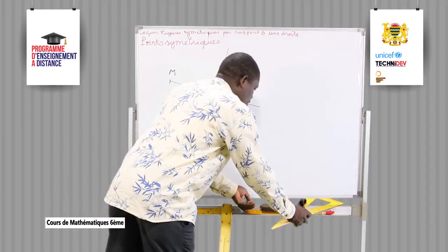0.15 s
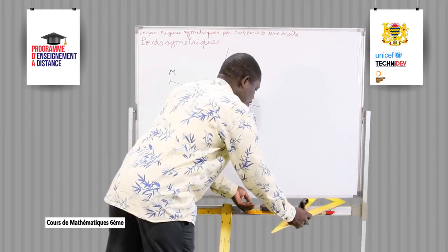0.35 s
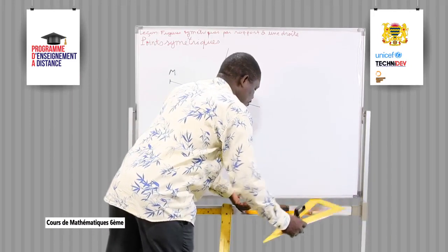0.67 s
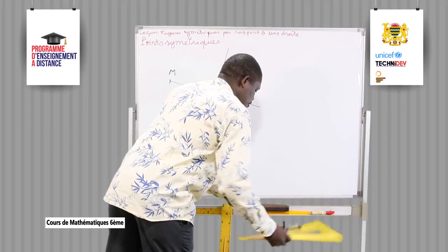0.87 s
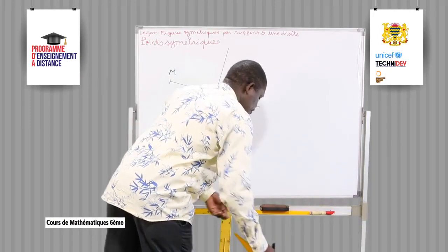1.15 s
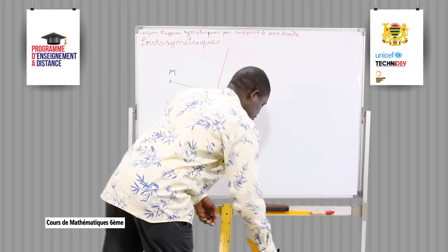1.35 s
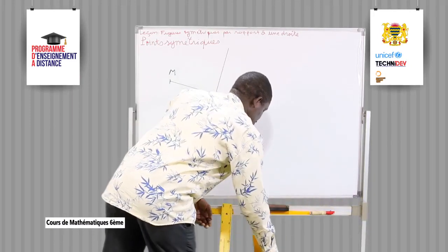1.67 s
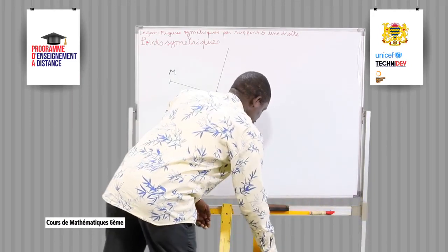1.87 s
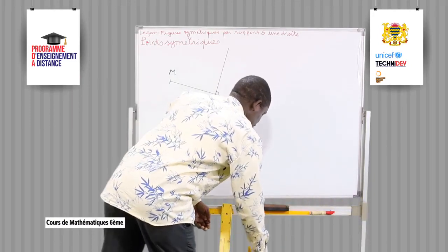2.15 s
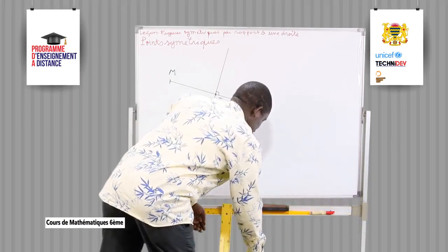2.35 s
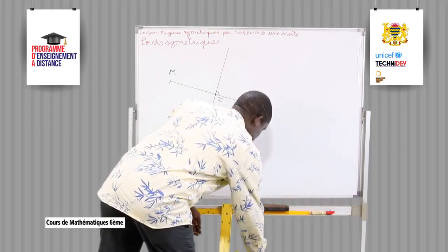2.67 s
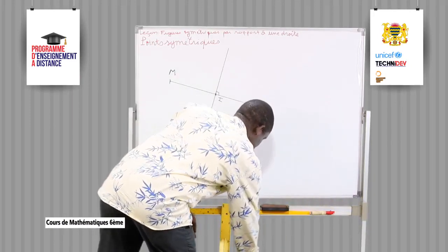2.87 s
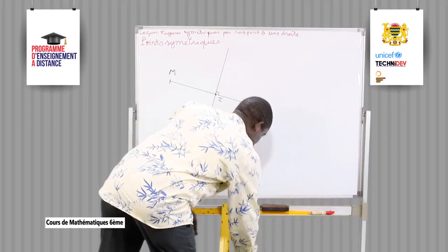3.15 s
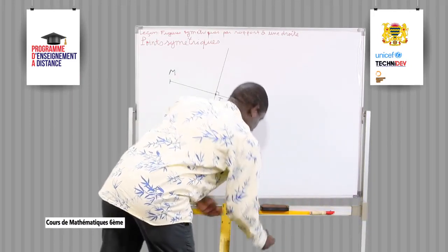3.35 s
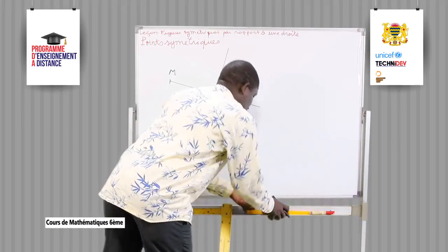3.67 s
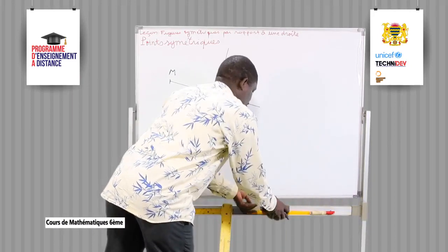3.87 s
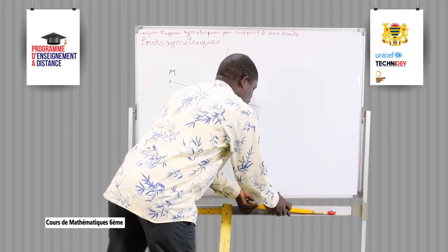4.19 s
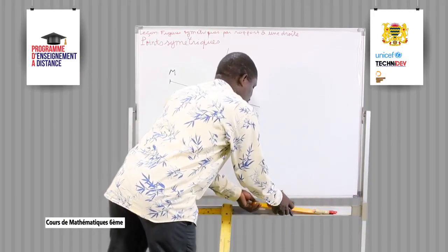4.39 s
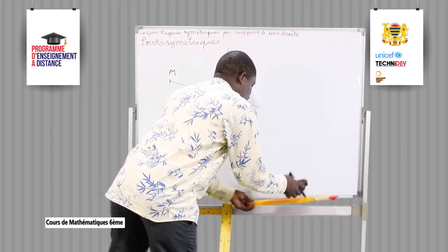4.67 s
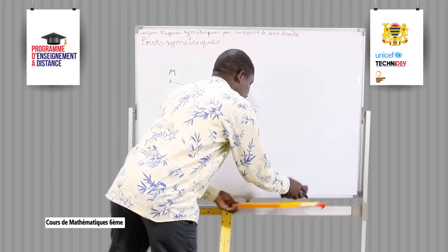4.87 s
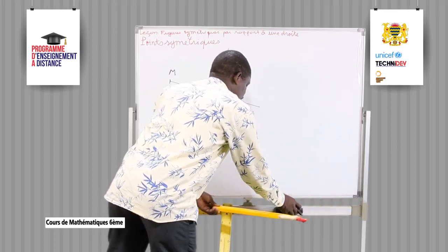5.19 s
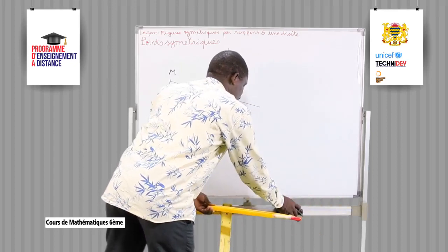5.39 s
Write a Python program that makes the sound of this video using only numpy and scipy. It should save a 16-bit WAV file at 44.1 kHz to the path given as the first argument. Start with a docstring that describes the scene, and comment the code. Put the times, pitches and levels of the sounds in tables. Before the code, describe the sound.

Light plastic taps and scrapes on a metal ledge, a sudden rattling drop, then a few hard knocks as tools are handled in a quiet room.

```python
"""A set square knocks and slides on a metal whiteboard tray and is let fall among other tools.
A large plastic compass is picked out and a marker laid down: cracks, fading modes, dense noise rings.
Slides are filtered streams of uneven slips; damped tones give lone thuds and ticks. The board and its
stand shudder in the bass, a shirt rustles as flickering noise near the one microphone, and a small
quiet room adds a short tail over the shaped-noise hiss of room and recorder."""
import sys
import numpy as np
from scipy import signal
from scipy.fft import rfft, irfft
from scipy.io import wavfile
from scipy.ndimage import uniform_filter1d

SR = 44100
rng = np.random.default_rng(int(sys.argv[2]) if len(sys.argv) > 2 else 0)


def store_wav(level_fs):
    """Save 16-bit WAV to argv[1]."""
    pcm = np.round(np.clip(np.atleast_2d(level_fs), -1, 1) * 32767)
    wavfile.write(sys.argv[1], SR, pcm.T.astype(np.int16))


N = 243873
T_S = np.arange(N) / SR

# Steady hiss. Each row: frequency in Hz, relative density in dB per Hz.
HISS_SHAPE = [(15, -36.5), (25, 14), (39, -18.5), (70, -6), (185, -12.5), (317, 0.5), (373, -3.5),
              (962, -14), (1040, -31), (1480, -28.5), (16000, -44)]
HISS_RMS_DB, CHANNEL_HISS_DB = -64.5, -79

# Pushes that rock the stand. Each row: start in seconds, deep shudder in dB, panel hum in dB, t60 in seconds.
STAND_PUSHES = [(.1, -58, -64, 1.3), (.33, -65, -60, 0.68), (.45, -63, -80, 1.1), (.65, -51, -48.5, 0.51),
                (1.03, -48, -51, 1.36), (1.15, -60, -67, 1.5), (1.69, -65, -63, 0.44),
                (2.35, -67, -69, 0.83), (3.126, -24.5, -49, 0.55), (3.48, -30.5, -43.5, 0.9),
                (3.75, -49.5, -47.5, 0.99), (3.941, -41, -57.5, 0.96), (4.503, -41, -31.5, 0.57),
                (5.41, -56, -57, 1.1)]
SHUDDER_SWELL_S, HUM_SWELL_S = 0.092, 0.09  # t60 of the late onset
SHUDDER_REST_DB, HUM_REST_DB = -69.5, -65.5

# Shirt against the microphone. Each row: time in seconds, low rub in dB, high rub in dB.
SHIRT_RUBS = [(0.1, -67.5, -68), (0.28, -59, -65), (0.47, -69, -66.5), (0.83, -63, -64), (1.23, -57, -64),
              (1.39, -63, -63.5), (1.95, -69.5, -68.5), (2.72, -65.5, -63.5), (2.8, -58.5, -58.5),
              (2.9, -63.5, -64), (3.1, -67, -67), (3.799, -52, -60), (4.119, -60.5, -64.5), (4.3, -73, -68),
              (4.55, -54, -60.5), (4.859, -56.5, -57), (5.151, -57.5, -61.5), (5.53, -70.5, -67)]

# Lone soft thuds and ticks. Each row: start in seconds, approximate peak in dB, frequency in Hz, t60 in seconds.
LONE_SOUNDS = [(.075, -45, 1930, 0.0025), (1.704, -38, 135, 0.035), (1.849, -46, 1130, 0.013)]

# Plastic dragged and rattled over metal. Each row: start in seconds, stop in seconds, level at start in dB,
# level at stop in dB, low resonance and edge resonance in dB against the middle.
PLASTIC_SLIDES = [(0.175, 0.23, -66, -62, 1.5, 0), (0.274, 0.365, -52, -57.5, -1.5, -5.5),
                  (0.646, 0.658, -49, -54, -2, -1.5), (0.676, 0.741, -48.5, -43, -0.5, 1.5),
                  (1.248, 1.244, -64, -51.5, 9, -17), (3.2, 3.43, -44, -34, 0.5, -12.5),
                  (3.43, 3.53, -29, -37, -7, -8.5), (3.534, 3.674, -27, -33.5, -5.5, -10.5),
                  (4.128, 4.155, -64, -39.5, 9.5, -5), (4.952, 4.946, -56, -58.5, 4, 18.5),
                  (5.385, 5.413, -54.5, -55, 0.2, -6)]
SLIDE_RISE_DB_PER_S, SLIDE_FALL_DB_PER_S = 1498.5, 598

# Blows of each tool. Each row: start in seconds, level in dB, thump in dB against it, hardness in dB per
# octave, pitch in Hz favoured by the spot struck, share of the base ring length.
SQUARE_BLOWS = [(0.185, -53.5, 10.5, -4, 900, 0.77), (0.239, -50, -15, -6, 1150, 0.59),
                (0.269, -35.5, -57, -4, 755, 0.55), (0.277, -41.5, 5.5, -2.8, 1630, 0.52),
                (0.292, -37, -29, -6.5, 1630, 0.46), (0.338, -52, 10, -1.7, 1660, 0.73),
                (0.356, -45.5, 12.5, -3.5, 2650, 0.6), (0.402, -52, 6, -2.5, 890, 0.36),
                (0.642, -39, 7, -3, 655, 0.74), (0.727, -38.5, -13, -1.5, 2780, 0.97),
                (0.76, -45.5, 2, -1, 2570, 0.33), (1.014, -31, -4, -1.3, 2270, 0.93),
                (1.255, -42.5, 1, -6, 880, 0.27), (1.309, -64.5, 0, 1, 592, 0.47),
                (1.437, -58.5, 21.5, 2.5, 540, 0.36)]
FALL_BLOWS = [(3.122, -15, -12, -0.95, 2200, 1.0), (3.138, -9, -15, 2.5, 810, 0.72),
              (3.161, -25.5, -30.5, 4.5, 2110, 0.87), (3.177, -22.5, -29.5, -6, 2160, 0.95),
              (3.194, -32, -30, .3, 636, 1), (3.227, -30.5, 1.5, -1, 860, 0.81),
              (3.268, -30, -12, 0.1, 836, 0.71), (3.314, -23, -10.5, -1.5, 2280, 0.76),
              (3.33, -20.5, -15, -3.5, 646, 0.35), (3.378, -32.5, -3, -4, 623, 0.96),
              (3.415, -30.5, -20, -6, 900, 1), (3.424, -22, -11.5, 2.5, 960, 0.8),
              (3.445, -22, -8.5, 0, 904, 0.47), (3.489, -21, -14, -3, 710, 0.6),
              (3.505, -26, -33, -2, 870, 0.81), (3.534, -21, -12, -3, 1890, 0.91),
              (3.563, -29.5, -34.5, -2, 895, 0.94), (3.589, -28.5, -9.5, -1.5, 730, 1),
              (3.616, -22.5, -27.5, -2.5, 1860, 1), (3.637, -30, -7, -1.5, 724, 1),
              (3.661, -36, -15, -2, 750, 1)]
COMPASS_BLOWS = [(3.977, -50.5, 6.5, -15, 958, 0.4), (3.993, -51.5, -8.5, -3.5, 710, 0.78),
                 (4.157, -28, -44, -5.5, 1030, 0.44), (4.168, -45, 5, -6, 860, 1.0),
                 (4.235, -46.5, -14, -0.5, 923, 0.45), (4.268, -40.5, -17, -10.5, 910, 0.47),
                 (4.462, -60, 16, -4, 620, 0.53), (4.47, -46, -7, -5, 1220, 1),
                 (4.507, -12.5, -24, -3.5, 774, 1.0), (4.598, -20.5, -20, -1, 1270, 0.29),
                 (4.616, -33.5, -1.5, -5, 857, 0.59), (4.643, -31, -12, -5, 650, 0.15),
                 (4.672, -34, -5.5, -2.4, 696, 0.28), (4.717, -38, -0.5, -4.5, 501, 0.22),
                 (4.751, -71.5, -1, 7, 810, 1.0), (5.415, -26, -5.5, -5, 724, 0.59),
                 (5.426, -20, -4, -4.5, 1503, 0.32)]
MARKER_BLOWS = [(4.937, -33, -4, -2.2, 2130, 0.47), (4.953, -26.5, -17, -2.5, 1960, 0.86),
                (4.965, -43, -18, -11, 2480, 0.55), (4.974, -40.5, -2.5, -7, 1510, 0.51),
                (5.016, -53, 1, -4, 2120, 0.61)]

# Modes that ring. Each row: frequency in Hz, relative level in dB, base t60 in seconds.
SQUARE_MODES = [(545, -9.5, 0.53), (671, 3, 0.14), (880, -11, 0.42), (1072, -3, 0.22), (1325, -1.5, 0.11),
                (1639, 3, 0.12), (1904, 1, 0.12), (2040, -19, 0.11), (2290, 0.5, 0.082), (2460, -7, 0.055),
                (2626, 2, 0.12), (3030, -1, 0.11), (3450, 9, 0.032), (4260, 3.5, 0.04), (4800, 0, 0.046),
                (8250, -16, .03), (8440, 15, 0.025)]
PILE_MODES = [(586, -7.5, 0.29), (671.3, -3.5, 0.28), (731, -2, 0.15), (876.4, -3, 0.2), (887, -2, 0.18),
              (962.4, -5.5, 0.19), (1374, -8.5, 0.17), (1440, -17.5, .12), (1856, -2.5, 0.051),
              (2070, -9, 0.055), (2093, -4.5, 0.16), (2400, -12.5, 0.11), (2364, -2.5, 0.14),
              (2407, -9, 0.14), (2527, -3.5, 0.17), (3400, -4, 0.079), (3910, -9, 0.3), (4080, -8, 0.093),
              (4330, -3.5, .1), (4596, -12, 0.034), (4890, -10, 0.1), (6200, -22, .08),
              (7400, -13.5, 0.049)]
COMPASS_MODES = [(157, -14.5, 0.44), (700, -1, 0.18), (825, -23.5, 0.26), (923, 5.5, 0.053),
                 (1040, -3.5, 0.039), (1318, -5, .12), (1360, 5, 0.09), (1540, 5, 0.064), (1736, 9, 0.081),
                 (1935, 0, 0.14), (2368, -4, 0.12), (2414, 1.5, 0.075), (4400, 7, 0.036), (4715, 5, 0.033),
                 (7870, 8, 0.018), (8310, 5.5, 0.025)]
MARKER_MODES = [(1480, 5.5, 0.1), (1760, -15, 0.048), (1935, -4, 0.083), (2210, -4, 0.089),
                (2330, -5.5, 0.049), (2460, -0.5, 0.063), (3330, -0.5, 0.14), (8450, 8, 0.028)]
BOARD_MODES = [(59, 0, .4), (92, -9, 3.0), (127, -14, 2.0), (146, -12, .4), (215, -10, 1.8), (380, -9, .25)]

# Dense ring of tray and tools between the clear modes. Each row: frequency in Hz, base t60 in seconds.
DENSE_RING = [(250, 0.34), (800, 0.2), (2200, 0.13), (5500, 0.12), (12000, 0.11)]

# Pitches in Hz at which tool colour is given.
COLOUR_HZ = [800, 2200, 5500, 12000]
# Colour of each tool, in dB at those pitches.
SQUARE_COLOUR_DB = [2, -1.5, -3.5, 2]
PILE_COLOUR_DB = [0.67, -0.2, 3.5, 0]
COMPASS_COLOUR_DB = [0.5, -3.5, 0.3, 0.1]
MARKER_COLOUR_DB = [-5, 2.5, -3.5, -5]
THUMP_HZ, HARDNESS_PIVOT_HZ = 250, 1300

# Variation from blow to blow at wobble 1: spread of mode level, share by which a mode shifts.
SCATTER_DB, DETUNE_SHARE = 2, .006
SPOT_DB, SPOT_WIDTH_SHARE = 8.5, 0.045  # lift of modes near the favoured pitch
DENSE_SPOT_DB = 3.5  # the same lift, broader, in the dense ring
PATH_S = 0.0017  # from tray to microphone

ROOM_DB, ROOM_T60_S = -18.5, 0.2

# Colour of capsule and cap. Each row: frequency in Hz, response in dB.
MICROPHONE_RESPONSE = [(1000, -3), (3000, -0.5), (4400, -1), (6200, -3.5), (8500, -2.5), (10500, -4),
                       (13000, -3), (15000, -6.5), (16300, -21.5), (16800, -54.5)]
TOP_HZ = 16400


def undb(db):
    """Amplitude from decibels."""
    return 10 ** (np.asarray(db) / 20)


def unit(x):
    """Scale to rms 1."""
    return x / np.sqrt(np.mean(x ** 2))


def band(x, lo_hz, hi_hz):
    """Band-pass at rms 1."""
    sos = signal.butter(2, [lo_hz, min(hi_hz, .45 * SR)], "bandpass", fs=SR, output="sos")
    return unit(signal.sosfilt(sos, x))


def noise():
    """White noise as long as the scene."""
    return rng.standard_normal(N)


def on_log(hz, at_hz, values):
    """Interpolate on log frequency."""
    return np.interp(np.log(hz), np.log(at_hz), values)


def fade(t_s, t60_s):
    """Exponential decay by 60 dB in t60."""
    return np.exp(-np.log(1000) * t_s / t60_s)


def walk(rate_hz):
    """Random levels joined by ramps; spread near 1."""
    step = int(SR / rate_hz)
    held = np.repeat(rng.standard_normal(N // step + 1), step)
    return 1.2 * uniform_filter1d(held, step)[:N]


def add(out, start_s, x):
    """Mix x into out, cut at its end."""
    i = int(start_s * SR)
    out[i:i + len(x)] += x[:len(out) - i]


def hiss():
    """Steady floor of room and recorder: noise shaped in the spectrum."""
    hz = np.maximum(np.arange(N // 2 + 1) * SR / N, 1)
    spectrum = rfft(noise()) * undb(on_log(hz, *np.transpose(HISS_SHAPE)))
    return undb(HISS_RMS_DB) * unit(irfft(spectrum, N))


def shudder():
    """After each push the stand rocks in the deep bass and the panel hums above it."""
    deep = band(band(noise(), 30, 90), 43, 68)
    hum = band(noise(), 100, 210)
    rocking = np.full(N, undb(SHUDDER_REST_DB))
    humming = np.full(N, undb(HUM_REST_DB))
    for start_s, deep_db, hum_db, t60_s in STAND_PUSHES:
        decay = fade(T_S, t60_s)
        add(rocking, start_s, undb(deep_db) * decay * (1 - fade(T_S, SHUDDER_SWELL_S)))
        add(humming, start_s, undb(hum_db) * decay * (1 - fade(T_S, HUM_SWELL_S)))
    return rocking * deep + humming * hum


def shirt():
    """Soft rubbing in two noise bands that flicker together."""
    at_s, low_db, high_db = np.transpose(SHIRT_RUBS)
    low = undb(np.interp(T_S, at_s, low_db)) * band(noise(), 120, 1600)
    high = undb(np.interp(T_S, at_s, high_db)) * band(noise(), 2200, 15000)
    flicker = undb(1.72 * walk(32))
    return flicker * (low + high)


def blips():
    """Lone thuds and ticks: short damped sines with a soft onset."""
    out, t_s = np.zeros(N), T_S[:int(.1 * SR)]
    for start_s, peak_db, hz, t60_s in LONE_SOUNDS:
        envelope = fade(t_s, t60_s) * (1 - fade(t_s, t60_s / 2))
        # 3 makes up for the level lost to the onset
        add(out, start_s, undb(peak_db) * 3 * np.sin(2 * np.pi * hz * t_s) * envelope)
    return out


def slides():
    """Dense uneven slips: clicks over hiss, heard in low, middle and edge resonances of tool and tray."""
    clicks = undb(3.5 * np.minimum(rng.exponential(size=N), 5))
    slips = noise() * clicks * undb(3 * walk(150))
    low = band(slips, 740, 1280)
    middle = unit(band(slips, 1400, 2800) + .5 * band(slips, 3000, 5000))
    edge = band(slips, 7000, 9500) + .8 * band(slips, 10500, 14500) + .4 * band(slips, 5000, 15000)
    edge = unit(edge)
    out = np.zeros(N)
    for start_s, stop_s, start_db, stop_db, low_db, edge_db in PLASTIC_SLIDES:
        db = np.interp(T_S, [start_s, stop_s], [start_db, stop_db])
        # a stop ahead of the start makes both slopes overlap: a short blip below the listed levels
        db -= SLIDE_RISE_DB_PER_S * np.maximum(start_s - T_S, 0)
        db -= SLIDE_FALL_DB_PER_S * np.maximum(T_S - stop_s, 0)
        out += undb(db) * (middle + undb(low_db) * low + undb(edge_db) * edge)
    return out


def chatter(x, db, count=4):
    """A loose tool bounces: copies 2 to 32 ms late, of random size and sign, later ones weaker on average."""
    out = x.copy()
    for when, size in rng.random((count, 2)):
        add(out, 0.002004 + .03 * when, x * undb(db - 20 * when) * (2 * size - 1))
    return out


def ring(modes, gain_db, share, t_s, wobble):
    """Fading sines; every blow lands elsewhere, and shifting contact makes each mode waver in strength."""
    hz, db, t60_s = (column[:, None] for column in np.transpose(modes))
    scatter, detune, sign = rng.standard_normal((3, len(modes), 1))
    size = undb(db + gain_db[:, None] + SCATTER_DB * wobble * scatter) * np.sign(sign)
    steps_s = np.arange(0, t_s[-1] + .008, .008)
    levels = rng.standard_normal((len(modes), len(steps_s)))
    waver = np.array([np.interp(t_s, steps_s, row) for row in levels])
    # slow modes of heavy parts stay steady
    depth = wobble * np.minimum(hz / 700, 1) ** 2
    tones = np.sin(2 * np.pi * hz * (1 + DETUNE_SHARE * wobble * detune) * t_s)
    return (size * tones * (1 + depth * waver) * fade(t_s, share * t60_s)).sum(axis=0)


def board(jolts):
    """The heavy board answers each jolt late and rings long in the bass."""
    t_s = T_S[:2 * SR]
    answer = ring(BOARD_MODES, np.zeros(len(BOARD_MODES)), 0.85, t_s, wobble=0)
    return signal.fftconvolve(jolts, answer * (1 - fade(t_s, 0.094)))[:N]


def knocks(blows, modes, colour_db, mode_db, dense_db, crack_db, board_db):
    """Each blow: a crack, clear modes, a dense ring in half-octave bands and the bass of the board."""
    out, jolts, t_s = np.zeros(N), np.zeros(N), T_S[:int(.36 * SR)]
    centres_hz = 180 * 2 ** np.arange(0, 6.6, .5)
    bands = np.array([band(noise(), hz / 1.19, hz * 1.19) for hz in centres_hz])
    dense_t60_s = on_log(centres_hz, *np.transpose(DENSE_RING))[:, None]
    mode_hz = np.array(modes)[:, 0]
    colour_hz = [THUMP_HZ, *COLOUR_HZ]
    octaves = np.log2(np.array(COLOUR_HZ) / HARDNESS_PIVOT_HZ)
    # the first contact is brief and brighter than the ring
    crack_gain = undb(crack_db + 3.9 * np.log2(centres_hz / 2000))[:, None]
    for start_s, level_db, thump_db, hardness_db, spot_hz, share in blows:
        # a harder contact tilts the colour towards the treble
        blow_db = [thump_db, *(colour_db + hardness_db * octaves)]

        crack = crack_gain * chatter(fade(t_s, 0.0066), db=-9)
        dense_spot_db = DENSE_SPOT_DB * np.exp(-np.log2(centres_hz / spot_hz) ** 2 / .16)
        shape = undb(dense_db + dense_spot_db)[:, None] * fade(t_s, share * dense_t60_s) + crack
        i = int(rng.random() * (N - len(t_s)))
        band_gain = undb(on_log(centres_hz, colour_hz, blow_db))[:, None]
        dense = (band_gain * bands[:, i:i + len(t_s)] * shape).sum(axis=0)

        # modes near the favoured pitch ring louder
        spot_db = SPOT_DB * np.exp(-(np.log(mode_hz / spot_hz) / SPOT_WIDTH_SHARE) ** 2)
        gain_db = mode_db + spot_db + on_log(mode_hz, colour_hz, blow_db)
        clear = chatter(ring(modes, gain_db, share, t_s, wobble=.9), db=-3.5)

        jolt = undb(level_db + thump_db + board_db)
        jolts[int(start_s * SR)] = jolt * np.sign(rng.standard_normal())
        onset = np.minimum(t_s / 0.0005, 1)
        add(out, start_s + PATH_S, undb(level_db) * (dense + clear) * onset)
    return out + board(jolts)


def set_square():
    """The set square knocks on the tray: its modes with a marked crack."""
    return knocks(SQUARE_BLOWS, SQUARE_MODES, SQUARE_COLOUR_DB,
                  mode_db=-8.0, dense_db=-13.5, crack_db=-7.5, board_db=-14)


def fall_among_tools():
    """The square falls among tools: modes of the pile, a strong dense ring and board bass."""
    return knocks(FALL_BLOWS, PILE_MODES, PILE_COLOUR_DB,
                  mode_db=-9, dense_db=-7.0, crack_db=-18, board_db=-7.5)


def compass():
    """The large plastic compass knocks as it is picked out: its modes over a weaker dense ring."""
    return knocks(COMPASS_BLOWS, COMPASS_MODES, COMPASS_COLOUR_DB,
                  mode_db=-10.5, dense_db=-13.5, crack_db=-13.0, board_db=-13)


def marker():
    """The marker is laid down: strong clear modes and crack, little dense ring."""
    return knocks(MARKER_BLOWS, MARKER_MODES, MARKER_COLOUR_DB,
                  mode_db=-4.5, dense_db=-15.0, crack_db=-6.0, board_db=-16)


def room(x):
    """A dull fading tail that starts with the first wall, 8 ms late."""
    t_s = T_S[:int(.6 * SR)]
    tail = band(rng.standard_normal(len(t_s)), 100, 4700) * fade(t_s, ROOM_T60_S) * (t_s > .008)
    return undb(ROOM_DB) * signal.fftconvolve(x, tail / np.sqrt(np.sum(tail ** 2)))[:N]


def scene():
    """Tools with their room tail, plus the unreverberated layers, alike in both channels."""
    tools = slides() + set_square() + fall_among_tools() + compass() + marker()
    mono = tools + room(tools) + hiss() + shudder() + shirt() + blips()
    return np.array([mono, mono])


def record(dry):
    """Capsule colour, rounded peaks, a faint hiss opposed between the channels and a cut top."""
    hz = np.linspace(0, SR / 2, 257)
    response_db = on_log(np.maximum(hz, 1), *np.transpose(MICROPHONE_RESPONSE))
    # doubled, as the minimum-phase step halves the dB
    capsule = signal.minimum_phase(signal.firwin2(511, hz, undb(2 * response_db), fs=SR))
    wet = np.tanh(1.5 * signal.lfilter(capsule, 1, dry)) / 1.5
    wet = wet + undb(CHANNEL_HISS_DB) * band(noise(), 60, 6500) * np.array([[1], [-1]])
    return signal.sosfilt(signal.ellip(12, .2, 95, TOP_HZ, fs=SR, output="sos"), wet)


dry = scene()
out = record(dry)
store_wav(out)
```